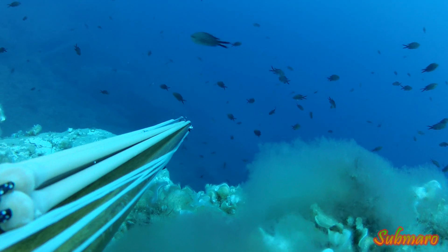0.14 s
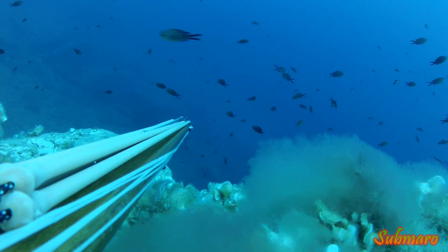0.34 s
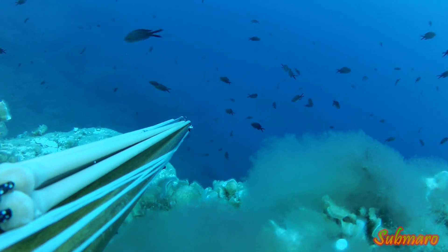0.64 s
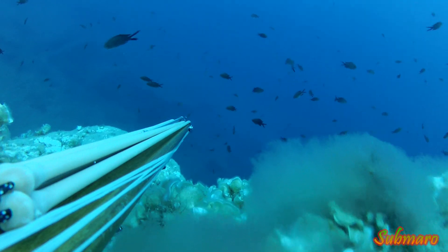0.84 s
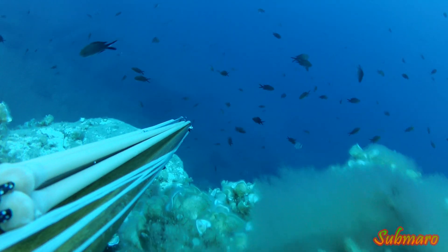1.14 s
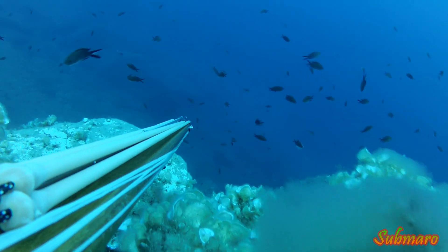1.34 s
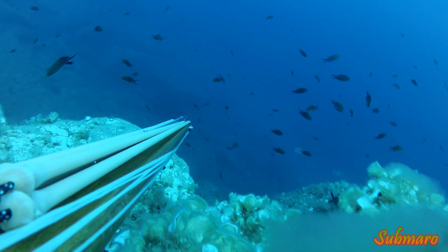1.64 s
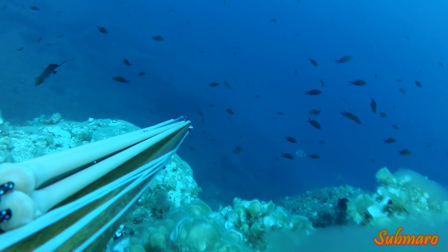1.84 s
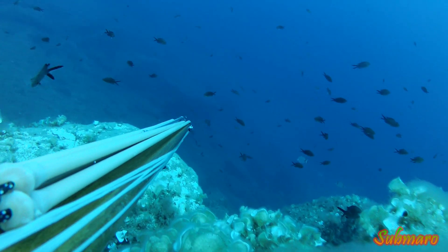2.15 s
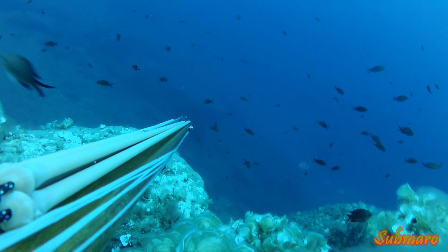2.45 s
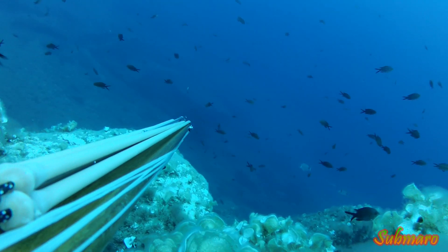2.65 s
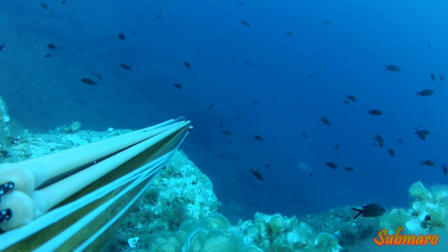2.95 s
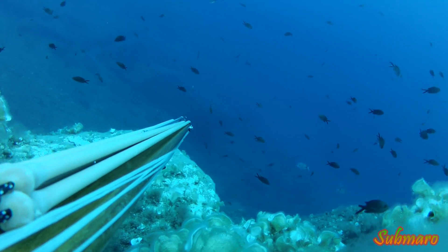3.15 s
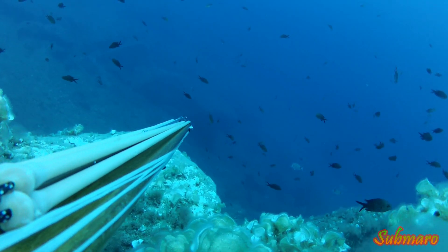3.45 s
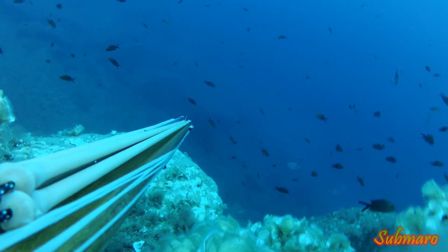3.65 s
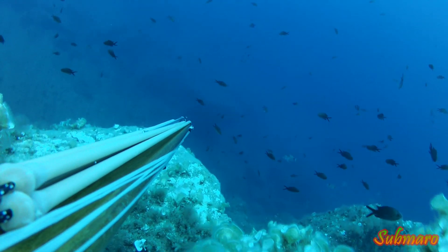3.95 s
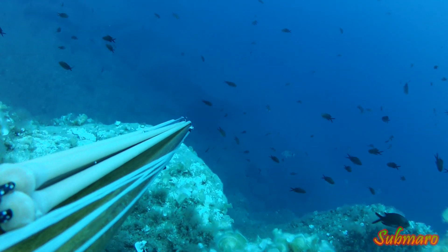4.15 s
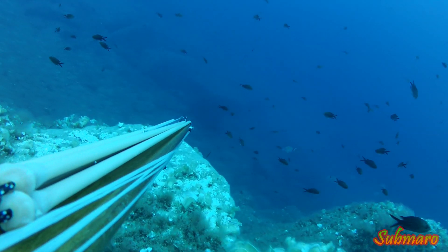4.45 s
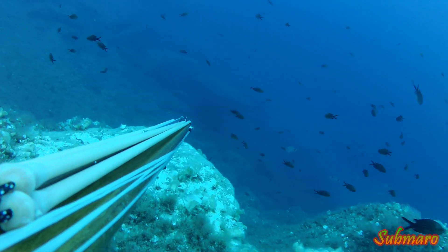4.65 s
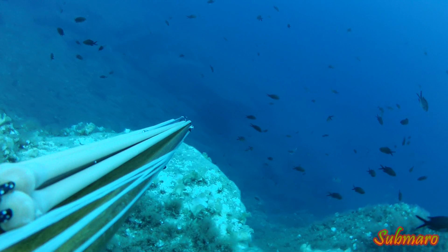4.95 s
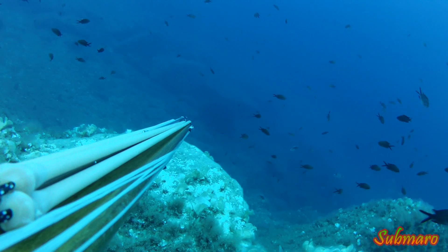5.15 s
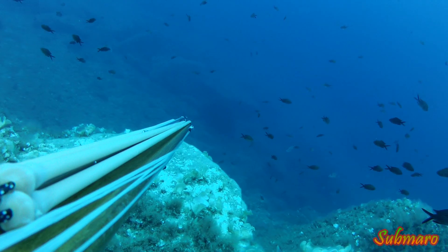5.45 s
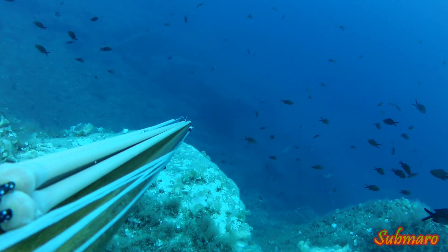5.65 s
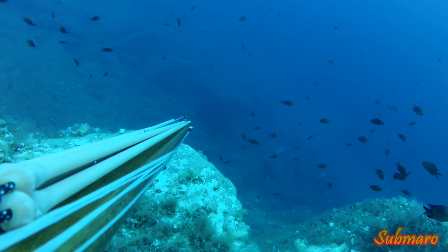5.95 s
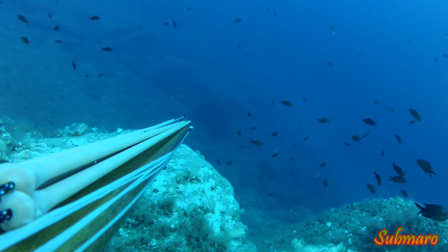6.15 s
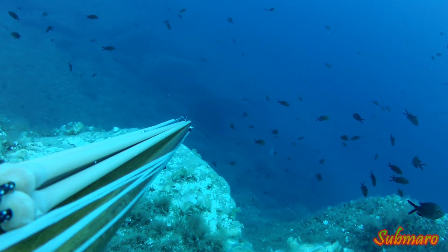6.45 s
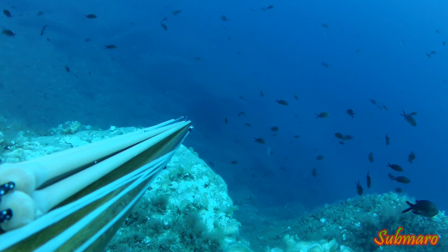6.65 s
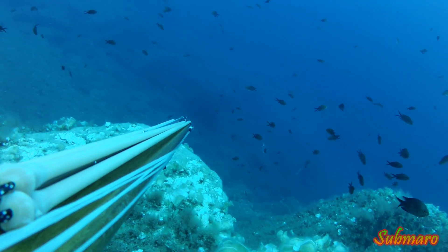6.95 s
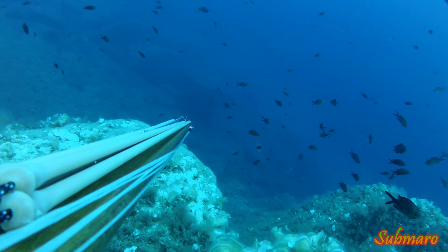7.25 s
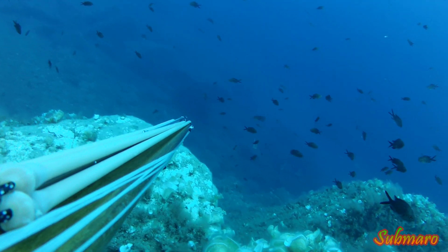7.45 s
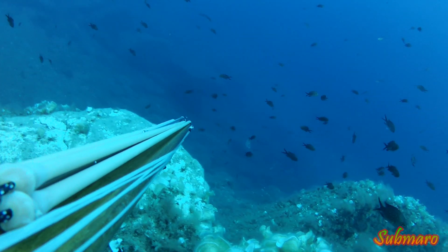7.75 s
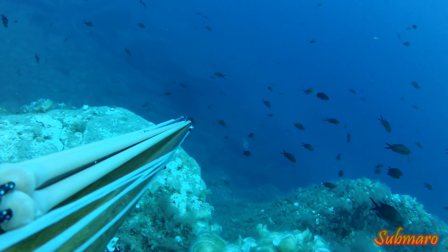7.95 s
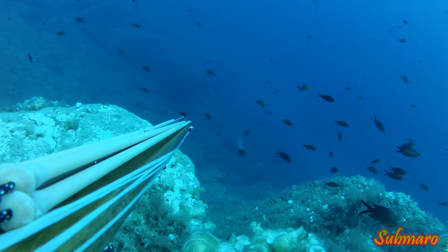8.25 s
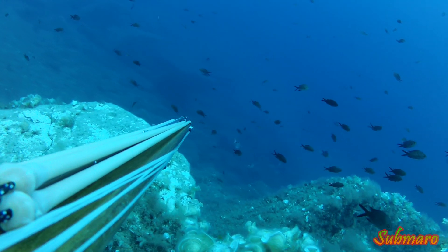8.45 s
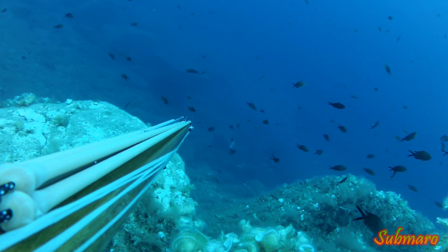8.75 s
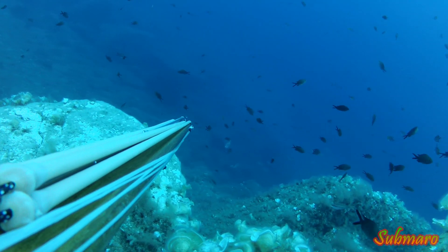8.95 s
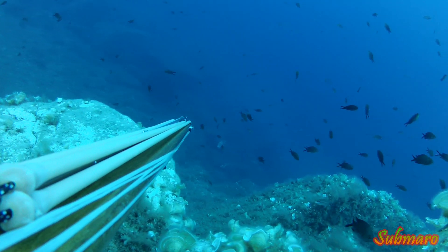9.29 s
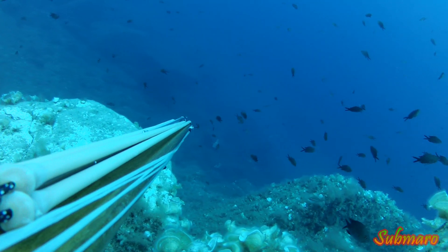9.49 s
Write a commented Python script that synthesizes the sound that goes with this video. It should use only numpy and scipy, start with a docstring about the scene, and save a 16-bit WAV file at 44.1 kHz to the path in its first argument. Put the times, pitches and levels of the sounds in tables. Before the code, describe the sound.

A quiet underwater reef heard by one microphone shut in a camera housing on a speargun. Throughout, distant shrimp make a fine, uneven crackle and fizz, with several closer, sharper snaps each second, some trailing tiny echoes off rock. Beneath lies a soft, low water rumble that slowly settles. At about 0.3 s a loud, dull thump swells and sags in pitch, followed by two weaker ones by 0.5 s. Faint ticks come near 1.0, 1.2 and 2.6 s, with a slight rub at 1.7 s. At 3.4 s a hard knock rings the gun briefly, then short gritty scrapes and a low wobble run to about 3.8 s. A small knock and wobble follow at 4.8 s. Two heavy muffled thumps land at 7.25 and 7.4 s, with a low shudder. Thin, high whistle edges tint the close sounds. Crackling continues to the end, with faint ticks at 8.7 and 9.3 s.

```python
"""Speargun on a crackling reef

A rocky reef under water, heard through a camera housing fixed to a speargun.
Shrimp snaps are spikes with noisy echoes, coloured by the housing, over a rumble of shaped noise.
Dull thumps are gliding tones with fading overtones; a thin high whistle rides on all the close sounds.
Knocks and scrapes ring the gun's decaying modes; slow wobbles of the mount are low, shuddering tones."""
import sys
import numpy as np
from scipy import signal
from scipy.fft import rfft, irfft
from scipy.io import wavfile
from scipy.ndimage import uniform_filter1d

SR = 44100
rng = np.random.default_rng(int(sys.argv[2]) if len(sys.argv) > 2 else 0)


def waveform_to_disk(signal):
    """Save audio, clipped to [-1, 1], as 16-bit WAV at the path in sys.argv[1]."""
    frames = np.transpose(np.atleast_2d(signal))
    scaled = np.clip(frames, -1, 1) * 32767
    samples = np.round(scaled).astype(np.int16)
    wavfile.write(sys.argv[1], SR, samples)


N = 424241
TIME = np.arange(N) / SR


def undb(db):
    """Decibels to gain."""
    return 10 ** (np.asarray(db) / 20)


def unit(x):
    """Scale to rms 1."""
    return x / np.sqrt(np.mean(x ** 2))


def peaking(sound, db):
    """Scale a sound to a peak level."""
    return sound * undb(db) / np.abs(sound).max()


def spectrum_at(hz, points):
    """Read a (Hz, dB) spectrum on a log-frequency axis."""
    point_hz, point_db = np.transpose(points)
    return np.interp(np.log(np.maximum(hz, 1)), np.log(point_hz), point_db)


def response(points, peaks=(), size=4096):
    """Minimum-phase impulse response of a spectrum with bell-shaped peaks and dips on it."""
    hz = np.arange(size // 2 + 1) * SR / size
    db = spectrum_at(hz, points)
    for peak_hz, width_hz, gain_db in peaks:
        db = db + gain_db / (1 + (2 * (hz - peak_hz) / width_hz) ** 2)
    # folding the cepstrum onto positive time makes the response causal
    cepstrum = irfft(np.log(undb(db)))
    cepstrum[1:size // 2] *= 2
    cepstrum[size // 2 + 1:] = 0
    return irfft(np.exp(rfft(cepstrum)))


def through(x, ring):
    """Pass a sound through an impulse response."""
    return signal.fftconvolve(x, ring)[:len(x)]


def low_passed(x, order, cutoff_hz):
    """Roll off a sound above a cutoff."""
    return signal.sosfilt(signal.butter(order, cutoff_hz, fs=SR, output="sos"), x)


def add(out, start, sound):
    """Mix in a sound at a time in seconds."""
    i = max(int(start * SR), 0)
    out[i:i + len(sound)] += sound[:N - i]


def walk(rate):
    """Smooth random drift of rms 1, heading for a new value this many times a second."""
    k = int(SR / rate)
    steps = np.repeat(rng.standard_normal(N // k + 1), k)
    smooth = uniform_filter1d(uniform_filter1d(steps, k), k)
    return unit(smooth[:N])


def clicks(rate, spread_db, size=N):
    """Random impulses at an average rate per second, many small and a few large."""
    when, strength = rng.random(size), rng.standard_normal(size)
    sign = rng.choice([-1, 1], size)
    out, hit = np.zeros(size), when < rate / SR
    out[hit] = sign[hit] * undb(spread_db * np.minimum(strength[hit], 2))
    return out


def swell_and_fade(t, swell, fade, curve=1.16, onset_curve=0.83):
    """Rounded rise, then a fall that is 30 dB down after the fade time."""
    fall = (np.maximum(t - swell, 0) / fade) ** curve
    rise = np.sin(np.pi / 2 * np.minimum(t / swell, 1)) ** onset_curve
    return rise * undb(-30 * fall)


# spectrum of the water moving round the housing: freq_hz, relative_db
WATER_SPECTRUM = [(15, -5.5), (30, -4.5), (44, 3), (68, -9), (110, -7), (160, -7.5), (280, -10.5),
                  (420, -15.5), (700, -22), (1300, -25.5), (3000, -31), (9000, -44.5), (11000, -59)]
WATER_DB, SETTLE_DB_PER_S = -59.0, 0.17  # starting level, and how fast it settles


def water(surge_db=0.83):
    """Moving water is noise weighted to the lows: a soft rumble that slowly settles and surges a little."""
    rumble = unit(through(rng.standard_normal(N), response(WATER_SPECTRUM)))
    return rumble * undb(WATER_DB - SETTLE_DB_PER_S * TIME + surge_db * walk(2.8))


# broad colour the housing gives a snap: freq_hz, gain_db
SNAP_COLOUR = [(300, -26.5), (900, -12.5), (1550, -5.5), (1950, -1), (3000, 1.5), (4800, 3.5), (5500, 6),
               (6000, -10), (6500, 1.5), (8000, -1), (9100, 1), (10200, -10.5), (11000, -23.5),
               (12500, -72)]
# resonances and dips of the housing wall, on top of that colour: freq_hz, width_hz, gain_db
WALL_RESONANCES = [(1875, 120, 8), (2460, 46, 8.5), (2707, 183, -6.5), (2840, 270, 7.5), (3280, 190, 2.5),
                   (3640, 104, -8), (3950, 55, 6), (5270, 390, -7.5), (6760, 112, -10.5), (8160, 120, 4.5),
                   (8460, 360, -7), (9400, 87, -19)]


def housing_response():
    """The housing passes the middle of a snap best, and its wall resonates."""
    return response(SNAP_COLOUR, WALL_RESONANCES)


REEF_ECHO_S = .042  # decay time constant


def snap_path(scatter_db, crack_s=0.0023, crack_db=16, echo_db=-10,
              ring_hz=2700, ring_s=0.0012, ring_db=-16, ring_spread_db=4, count=3):
    """A bubble collapse as it arrives: direct spike, scatter off near rock, a few echoes, the wider reef."""
    t = TIME[:SR // 6]
    reef = np.exp(-t / REEF_ECHO_S)
    # boulders some metres away each return a small burst like the near scatter
    since = t - rng.uniform(.003, .035, (count, 1))
    echoes = np.sum((since > 0) * np.exp(-np.abs(since) / crack_s), axis=0) * reef
    near_rock = undb(crack_db) * (np.exp(-t / crack_s) + undb(echo_db) * echoes)
    path = undb(scatter_db) * rng.standard_normal(len(t)) * (near_rock + reef)
    path[0] += 1  # the direct spike
    # each direction of arrival rings the housing at its own pitch and strength
    hz = ring_hz * (1 + .35 * min(rng.exponential(), 4))
    ring = np.sin(2 * np.pi * hz * t) * np.exp(-t / ring_s)
    return path + undb(ring_db + ring_spread_db * rng.standard_normal()) * ring


# busyness of the distant colony, joined by straight lines: time_s, reference_level_db
COLONY_LEVEL = [(0.0, -62.5), (0.4, -67), (0.8, -65), (1.1, -69), (1.42, -63.5), (1.6, -66), (3.32, -68.5),
                (3.72, -63), (3.94, -69.5), (5.73, -68), (6.03, -70), (6.51, -65.5), (6.67, -69),
                (7.53, -64.5), (7.98, -68.5), (8.6, -69), (8.84, -66), (9.62, -70)]


def colony_db(time):
    """Reference level of the colony at a time."""
    return np.interp(time, *np.transpose(COLONY_LEVEL))


def far_shrimp(housing, crackle_db=-2.0, fizz_db=-6.5, swell_db=2.5, count=12):
    """Snaps from several patches of rock, over a fizz of dense tiny clicks that comes in little swells."""
    crackle = np.zeros(N)
    for _ in range(count):
        crackle += through(clicks(rate=9.7, spread_db=4.0), snap_path(scatter_db=-28.0))
    fizz = clicks(rate=3200, spread_db=5) * undb(swell_db * walk(25))
    crackle = undb(crackle_db) * unit(through(crackle, housing))
    fizz = undb(fizz_db) * unit(through(fizz, housing))
    return (crackle + fizz) * undb(colony_db(TIME))


SNAP_S = .02  # a snap's level is its whole energy averaged over this time


def snap(housing, db, echo_db):
    """One bubble collapse as the housing passes it on, at the given level."""
    sound = through(snap_path(echo_db), housing)
    return sound * undb(db) / np.sqrt(np.sum(sound ** 2) / (SNAP_S * SR))


NEIGHBOURS_PER_S = 5
NEIGHBOUR_DB, NEIGHBOUR_SPREAD_DB = 7.5, 0.7  # above the colony's reference level, and its scatter
NEIGHBOUR_ECHO_DB, ECHO_DB_PER_DB = -29, 3.7  # louder snaps carry less echo


def neighbour_shrimp(housing):
    """Single snaps from the surrounding rocks, at random moments, louder while the colony is busy."""
    out = np.zeros(N)
    for k in range(int(NEIGHBOURS_PER_S * N / SR)):
        start = (k + rng.random()) / NEIGHBOURS_PER_S
        nearness_db = NEIGHBOUR_SPREAD_DB * rng.standard_normal()
        db = colony_db(start) + NEIGHBOUR_DB + nearness_db
        add(out, start, snap(housing, db, NEIGHBOUR_ECHO_DB - ECHO_DB_PER_DB * nearness_db))
    return out


# the closest shrimp snaps: start_s, level_db (rms over SNAP_S), echo_db (reef against direct spike)
CLOSE_SNAPS = [(0.1166, -55.5, -34), (0.165, -60.5, -31), (0.2531, -61, -34), (0.5367, -55.5, -46),
               (0.5905, -59.0, -43), (0.772, -61, -28), (0.8193, -54.5, -31), (1.024, -59.0, -28),
               (1.1432, -55.5, -32), (1.361, -54.5, -44), (1.3735, -53.0, -35), (1.496, -52.0, -29),
               (1.552, -57.0, -32), (2.0993, -56.5, -30), (2.42, -53.0, -31), (2.4998, -60.5, -31),
               (2.7384, -51.0, -32), (2.929, -61.5, -37), (3.237, -62.5, -21), (3.5107, -64, -26),
               (3.8096, -56.5, -27), (4.0794, -53.5, -15), (4.1371, -48, -27), (4.359, -57, -20),
               (4.492, -59, -20), (4.936, -58.5, -23), (5.03, -59.5, -40), (5.289, -59.5, -39),
               (5.4334, -58, -32), (5.518, -58.5, -36), (5.6113, -57.5, -32), (5.697, -50.5, -26.5),
               (5.9449, -51, -28), (6.342, -59.5, -25), (6.3713, -55.5, -21), (6.4256, -55.5, -27),
               (6.5373, -62.5, -21), (6.7022, -51.5, -13), (6.8555, -53, -28), (7.005, -56, -32),
               (7.041, -53, -33), (7.2375, -57.5, -29), (7.473, -53.5, -26), (7.584, -60.5, -34),
               (8.287, -63.5, -28), (8.3744, -61, -25.5), (8.676, -55.5, -23), (8.74, -57, -23),
               (8.8046, -55.5, -45), (8.8849, -55, -21), (9.061, -59.0, -25), (9.2427, -59.5, -34)]


def near_shrimp(housing, lead_s=0.0034, lead_db=-14):
    """Single snaps; a weak tick runs just ahead of each crack."""
    out = np.zeros(N)
    for start, db, echo_db in CLOSE_SNAPS:
        add(out, start, snap(housing, db, echo_db))
        add(out, start - lead_s, snap(housing, db + lead_db, echo_db))
    return out


# dull thumps: start_s, peak_db, swell_s, fade_s, start_hz, crest_hz, end_hz,
# overtone_db (before the body dulls it), overtone_hold_s
THUMPS = [(0.290, -9.5, 0.04, 0.067, 151.6, 188.2, 127, -5.5, 0.017),
          (0.357, -18.5, 0.013, 0.039, 138.6, 141, 122, -18, 0.024),
          (0.481, -24, 0.01, 0.029, 158, 123.3, 101, -23, 0.014),
          (4.427, -48.5, 0.0053, 0.032, 151, 133, 120, -20, .01),
          (5.497, -51.5, 0.011, 0.07, 164, 155, 135, -15, .01),
          (7.086, -47.5, 0.01, 0.022, 155, 143, 125, -7, 0.012),
          (7.254, -13, 0.027, 0.055, 151, 134.2, 107, -6, 0.028),
          (7.365, -16, 0.044, 0.04, 154.7, 137.4, 92, -12, 0.051)]


def thumps(mellow_db_per_s=650, body_hz=322, third_db=-35, rough_db=-45, rough_hz=700):
    """A few heavy vibrations each, lopsided at first; then the wave rounds off and its pitch sags."""
    out, t = np.zeros(N), TIME[:SR // 5]
    for start, db, swell, fade, start_hz, crest_hz, end_hz, overtone_db, hold in THUMPS:
        # the pitch moves late in the swell and slides evenly in the fade
        hz = start_hz + (crest_hz - start_hz) * np.minimum(t / swell, 1) ** 3
        hz = hz + (end_hz - crest_hz) * np.clip((t - swell) / fade, 0, 1)
        phase = 2 * np.pi * np.cumsum(hz) / SR
        # the body dulls the overtones steeply once the second harmonic passes body_hz
        passed = 1 / np.sqrt(1 + (2 * hz / body_hz) ** 24)
        overtone = passed * undb(overtone_db - mellow_db_per_s * np.maximum(t - hold, 0))
        harmonics = np.sin(2 * phase) + undb(third_db) * np.sin(3 * phase)
        tone = overtone * harmonics - np.sin(phase)
        rough = unit(low_passed(rng.standard_normal(len(t)), 6, rough_hz))
        thump = (tone + undb(rough_db) * rough) * swell_and_fade(t, swell, fade)
        add(out, start, peaking(thump, db))
    return out


MIRROR_HZ, MIRROR_DB = 12000, 2.5


def whistle(x, mirrored_hz=1400):
    """A thin whistle on close sounds: the slope of their low wave, mirrored around a high frequency."""
    lows = low_passed(x, 4, mirrored_hz)
    return undb(MIRROR_DB) * np.gradient(lows) * np.cos(2 * np.pi * MIRROR_HZ * TIME)


# modes of the gun and its mount, ringing freely: freq_hz, level_db, t60_s
GUN_MODES = [(174, -6.5, 0.16), (232.7, 3.5, 0.13), (327, 3, 0.12), (490, -8.5, 0.14), (601, 2.5, 0.087),
             (679, 7.5, 0.05), (807, -4, 0.15), (1023, -8, 0.12), (1152, -7.5, 0.097), (1251, 3.5, 0.04),
             (1440, -35.5, 0.035), (1937, -12, 0.069), (2100, -41, 0.0066), (2740, -27, 0.11),
             (3080, -34, 0.04)]


def gun_ring(tilt_db, ring, detune=0.0089):
    """The gun's modes after one blow; the grip shifts them slightly and scales their ring time."""
    t = TIME[:SR // 3]
    hz, db, t60 = np.transpose(GUN_MODES)[:, :, None]
    hz = hz * (1 + detune * rng.standard_normal(hz.shape))
    gain = undb(db + tilt_db * np.log2(hz / hz[0])) * rng.choice([-1, 1], hz.shape)
    decay = np.exp(-np.log(1000) * t / (t60 * ring))
    return np.sum(gain * np.sin(2 * np.pi * hz * t) * decay, axis=0)


# dry crack of a hard contact on the gun: freq_hz, gain_db
CONTACT_SPECTRUM = [(200, 2), (900, 1), (1400, 3), (2200, -4), (2900, -22.5), (4200, -30), (8000, -40)]


def contact(crack_s=.002):
    """A brief burst of noise where two hard surfaces meet."""
    t = TIME[:SR // 3]
    burst = rng.standard_normal(len(t)) * np.exp(-t / crack_s)
    return through(burst, response(CONTACT_SPECTRUM))


# knocks and ticks on the gun: start_s, peak_db (of the ring), tilt_db_per_octave, ring_time_factor
KNOCKS = [(1.0016, -49, 11, 0.2), (1.2342, -42.5, 17, 0.24), (2.6067, -48, 10, 0.27), (3.417, -36, -4, 2.6),
          (3.4316, -32, 22, 0.35), (3.4342, -22.5, 2, 0.5), (3.442, -25, -4.5, 1.1), (3.5397, -34, 3, 0.85),
          (4.7696, -42.5, 0, 0.65), (7.2236, -47.5, 5, 0.56), (8.717, -46.5, 6, 0.41),
          (9.2858, -45.5, 3, 0.18)]


def knocks(crack_db=-13, crack_db_per_tilt=0.46):
    """Each blow rings the gun's modes and adds a contact crack, stronger when the ring is brighter."""
    out = np.zeros(N)
    for start, db, tilt_db, ring in KNOCKS:
        add(out, start, peaking(gun_ring(tilt_db, ring), db))
        add(out, start, peaking(contact(), db + crack_db + crack_db_per_tilt * tilt_db))
    return out


# something slides along the gun: start_s, length_s (before release), reference_level_db,
# grit_db (against that level), tilt_db_per_octave (also shifts the rasp, in dB)
SLIDES = [(1.728, .13, -50.5, -11, -7), (3.457, 0.048, -40, -17.5, -5), (3.545, 0.03, -39, -8, -3),
          (3.598, .148, -43.5, -5.5, 6)]
SLIDE_ATTACK_S, SLIDE_RELEASE_S = 0.012, 0.032


def slides(hum_db=-3, hum_hz=250, hum_t60=0.11, rasp_db=-10, press_db_per_s=22):
    """Tiny slips rasp, rattle the gun and hum its low bending mode; pressure builds until it lets go."""
    out, t = np.zeros(N), TIME[:SR // 3]
    bending = np.sin(2 * np.pi * hum_hz * t) * np.exp(-np.log(1000) * t / hum_t60)
    for start, length, db, grit_db, tilt_db in SLIDES:
        slips = clicks(rate=1000, spread_db=5, size=len(t))
        rasp = undb(rasp_db + tilt_db) * unit(through(slips, response(CONTACT_SPECTRUM)))
        grit = unit(through(slips, gun_ring(tilt_db, ring=0.8))) + rasp
        hum = unit(through(slips, bending))
        attack = np.clip(t / SLIDE_ATTACK_S, 0, 1)
        release = np.clip(1 - (t - length) / SLIDE_RELEASE_S, 0, 1)
        build_db = press_db_per_s * np.minimum(t - length, 0)
        scrape = undb(grit_db) * grit + undb(hum_db) * hum
        add(out, start, undb(db + build_db) * attack * release * scrape)
    return out


# spectrum of the mount's shudder: freq_hz, relative_db
SHUDDER_SPECTRUM = [(60, -5), (110, 1.5), (180, 9), (330, -4), (550, -23), (1200, -46)]
# slow wobbles of the mount: start_s, peak_db, swell_s, fade_s, pitch_hz, shudder_db
WOBBLES = [(3.456, -36.5, 0.016, 0.12, 40, -27), (3.627, -29.5, 0.014, 0.17, 42.4, -19),
           (4.768, -35.5, 0.0099, 0.17, 49.5, -12), (7.257, -39, 0.021, 0.11, 45.4, -5)]


def wobbles():
    """The mount sways at a low pitch, roughened by a noisy shudder, and settles."""
    out, t = np.zeros(N), TIME[:SR // 2]
    for start, db, swell, fade, hz, shudder_db in WOBBLES:
        noise = through(rng.standard_normal(len(t)), response(SHUDDER_SPECTRUM))
        sway = np.sin(2 * np.pi * hz * t) + undb(shudder_db) * unit(noise)
        add(out, start, peaking(sway * swell_and_fade(t, swell, fade), db))
    return out


def scene():
    """Everything reaches one microphone inside the housing."""
    housing = housing_response()
    shrimp = far_shrimp(housing) + neighbour_shrimp(housing) + near_shrimp(housing)
    close = thumps() + knocks() + slides() + wobbles()
    return (water() + shrimp + close + whistle(close))[None]


TOP_HZ = 13700


def record(dry):
    """The camera cuts the top with a steep low-pass."""
    return signal.sosfilt(signal.ellip(8, .2, 70, TOP_HZ, fs=SR, output="sos"), dry)


dry = scene()
out = record(dry)
waveform_to_disk(out)
```